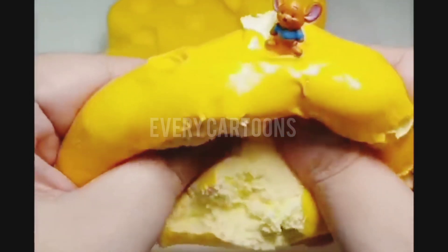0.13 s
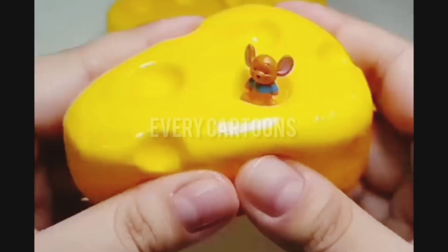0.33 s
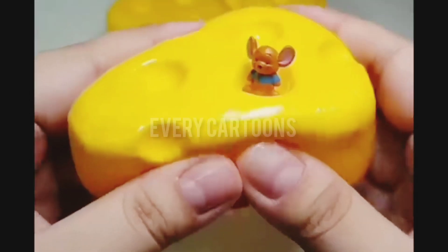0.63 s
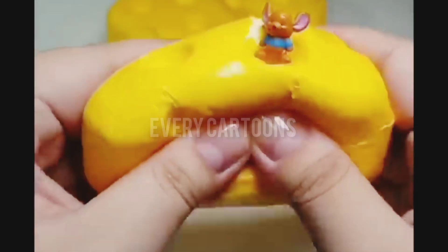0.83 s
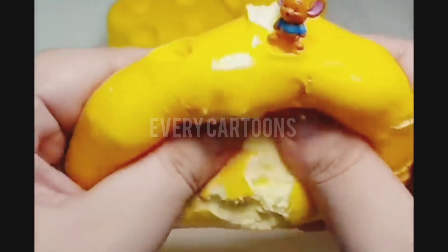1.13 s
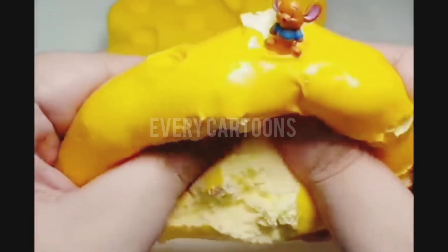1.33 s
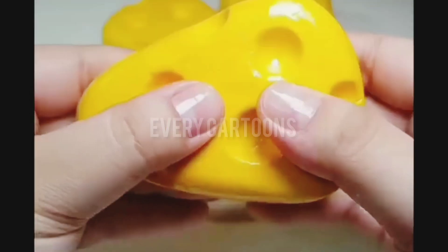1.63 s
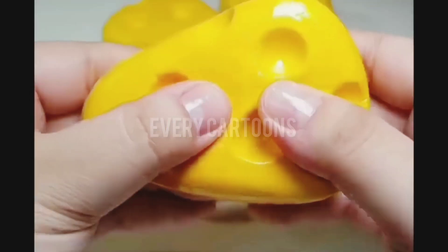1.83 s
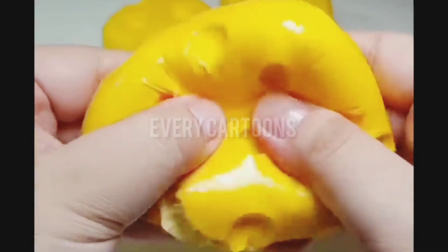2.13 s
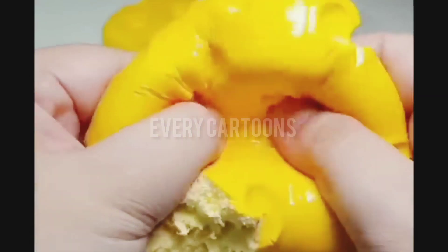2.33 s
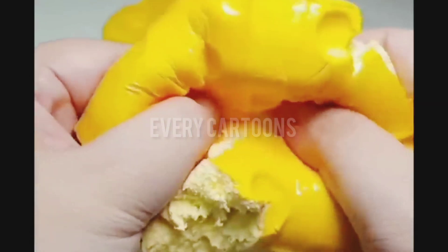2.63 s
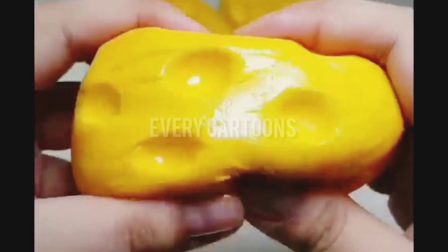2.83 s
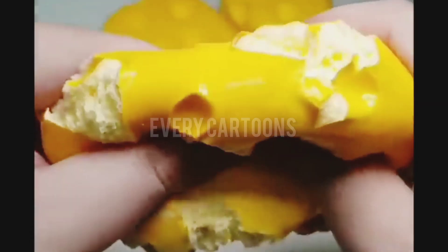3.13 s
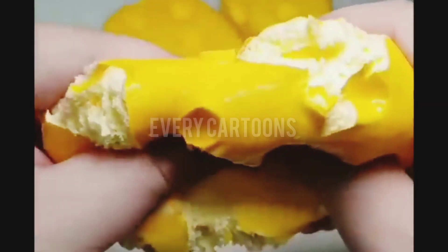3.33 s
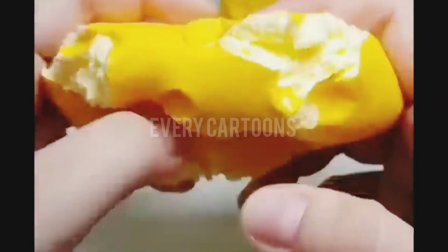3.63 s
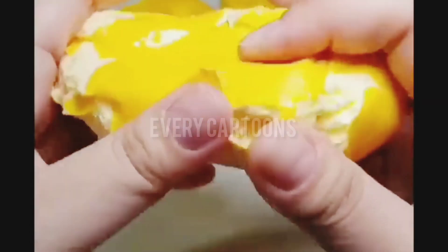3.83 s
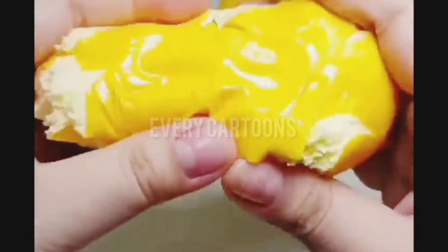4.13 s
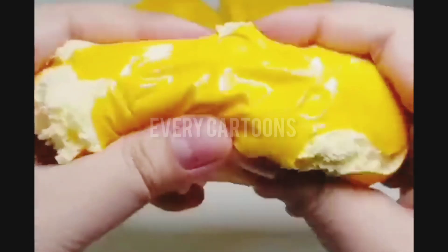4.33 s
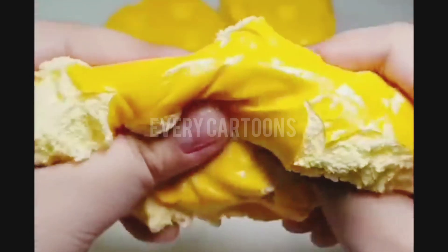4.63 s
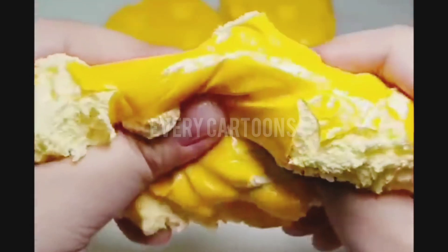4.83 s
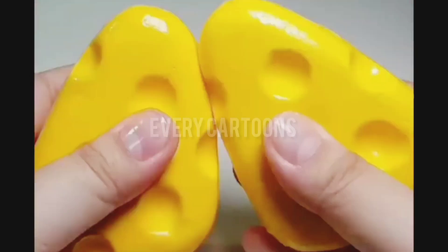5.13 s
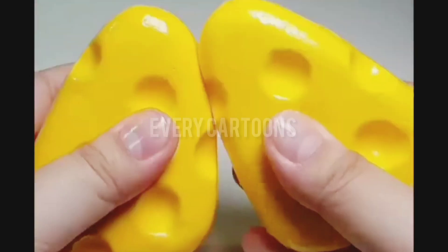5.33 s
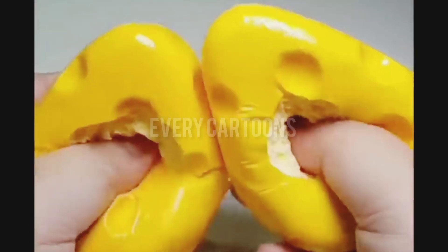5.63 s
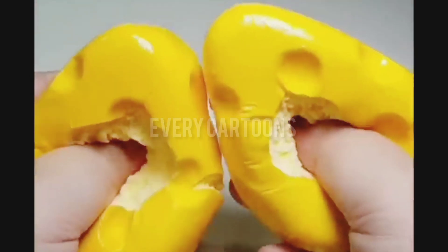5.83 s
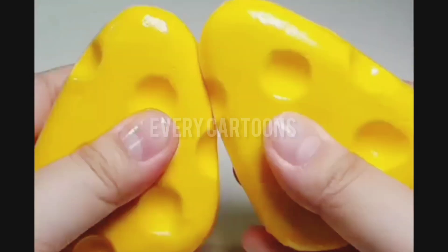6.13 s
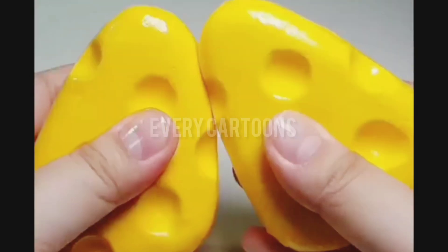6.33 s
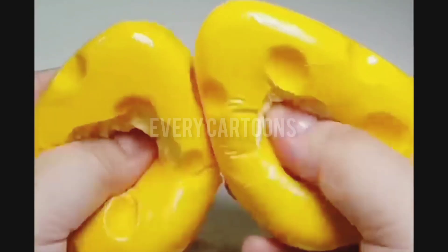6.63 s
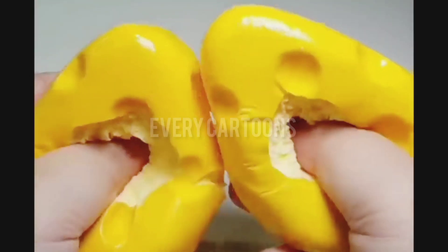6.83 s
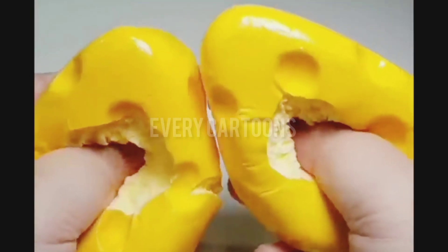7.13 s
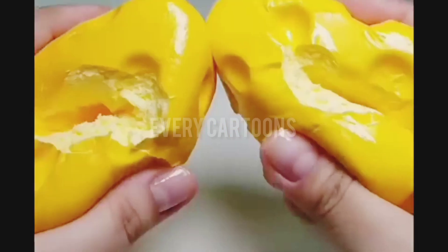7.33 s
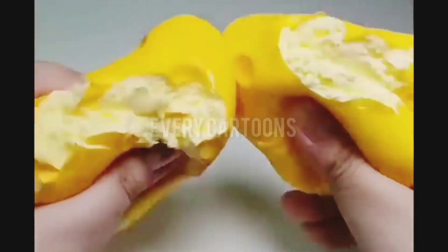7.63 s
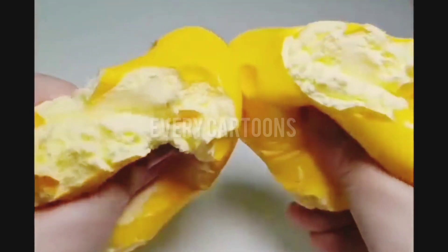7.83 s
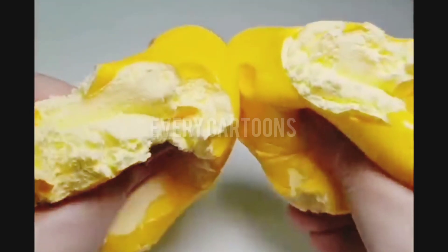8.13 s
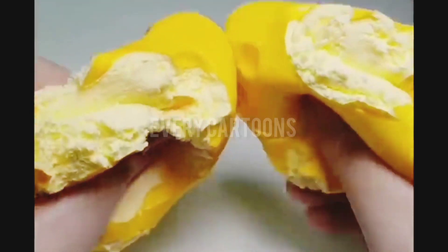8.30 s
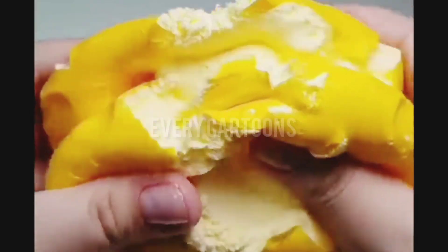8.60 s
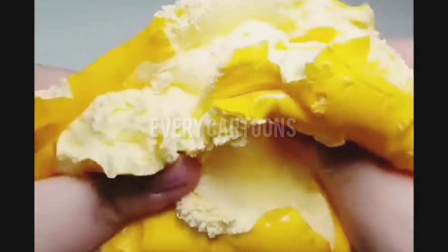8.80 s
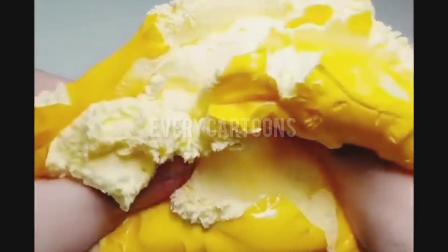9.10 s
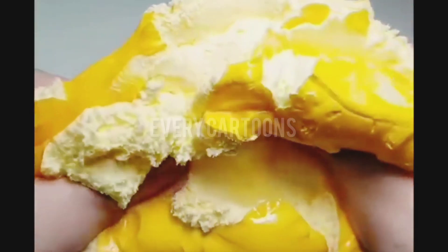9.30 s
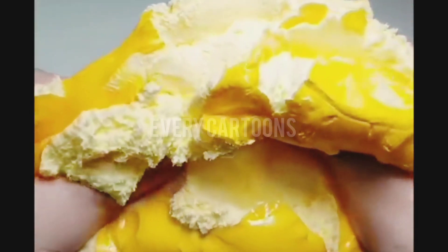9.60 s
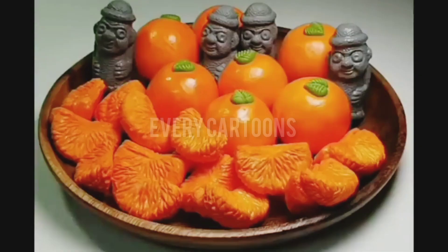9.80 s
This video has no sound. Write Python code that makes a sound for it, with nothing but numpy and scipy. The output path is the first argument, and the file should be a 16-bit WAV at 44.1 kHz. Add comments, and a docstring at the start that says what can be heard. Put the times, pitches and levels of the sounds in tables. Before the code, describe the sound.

A close, dry crunching of clay under thumbs in a quiet small room. Sharp cracks and gritty crumbling start at once and stop by 0.35 s. After a pause of faint room noise, a longer crackling run lasts from 1.05 to 1.7 s, then a dense crunch from 2.2 to 2.75. A heavier, lower push comes at 3.2-3.5, trailing into tiny ticks around 3.9. Sparser, isolated snaps follow at 4.45-4.95. Fuller crunches return at 5.8-6.05, 6.87-7.15 and 7.77-8.15, and a strong, thick one at 8.8-9.1 thins into scattered crackles until 9.6. Each burst mixes bright clicks, fine dusty grit and a soft low rumble, with very short doubled echoes and a faint room tail. Between them, airy room noise steps up and sinks over constant thin hiss. Everything cuts to silence at 9.7 s.

```python
"""A quiet room: thumbs crush a brittle-skinned clay wedge close by, in bursts with pauses between.
Skin cracks are shaped noise bursts; crumbling is a swarm of tiny snaps over dust hiss; the soft core
adds a lumpy low rumble. Walls add a short noise tail; room noise steps up and sinks over microphone hiss.
Overlapping pieces 11.6 ms apart give every sound faint ghosts; some cracks are heard twice."""
import sys
import numpy as np
from scipy import signal
from scipy.fft import rfft, irfft
from scipy.io import wavfile
from scipy.ndimage import uniform_filter1d, minimum_filter1d

SR = 44100
rng = np.random.default_rng(int(sys.argv[2]) if len(sys.argv) > 2 else 0)


def pcm_store(signal):
    """Save signal as 16-bit PCM."""
    levels = np.round(np.clip(np.atleast_2d(signal), -1, 1) * 32767)
    wavfile.write(sys.argv[1], SR, levels.astype(np.int16).T)


N = 439236
STEP = 512  # samples between overlapping pieces


# skin breaks: start_s, peak_db (before shading), low_against_high_db, repeat_one_step_later_db (-40: none)
SKIN_CRACKS = [(0.0207, 5, -9, -43), (0.03, 0, -4, -46), (0.062, -10, 6.5, 7), (0.0843, -8.5, -19, -48),
               (0.159, 0, -11, -37), (0.251, -16, -8, -40), (0.2695, 4.5, -10, -42),
               (0.3317, -4.5, -11, -42), (1.0525, -11, -7, 1), (1.1073, -13.5, -20, 6),
               (1.1338, -4.5, -8, -40), (1.1659, 2, -6, -40.5), (1.1895, -8.5, -0.5, -11.5),
               (1.2039, -4, -3, -44), (1.2228, -10.5, 15, 7), (1.2945, -3, -0.5, -42),
               (1.3233, -14, -6, -23.5), (1.3765, 2.5, -3.5, -40), (1.3888, -11, -16, -44),
               (1.4008, 3, -13, -38.5), (1.4331, -3.5, 5.5, -41), (1.4437, -8, -18.5, -4),
               (1.5186, -6, -8.5, 1.5), (1.6106, -5.5, -15.5, 2), (1.6816, -5, -10.5, 1),
               (2.205, -19.5, -0.5, -43.5), (2.217, -3.5, 4.5, 5.5), (2.3304, -1.5, -7, -39.5),
               (2.3465, -3.5, -14.5, -42), (2.3746, -1, -7.5, -38.5), (2.3838, -3, -13, -39.5),
               (2.394, -4, -7.5, -41.5), (2.418, 3, 0, -40), (2.4292, -3.5, 2, -42.5),
               (2.442, -6, -7.5, -39.5), (2.4527, -4.5, -7.5, -38.5), (2.462, -3.5, -3.5, -42.5),
               (2.4918, -6.5, -13.5, -38), (2.5, -11, -6, -42.5), (2.5078, -5.5, -11.5, -40),
               (2.5222, -5.5, -11.5, -40), (2.5371, -2.5, -4, -39), (2.5696, 0, -6, -41.5),
               (2.5849, -8, -6.5, -41.5), (2.604, -1, -9, -42), (2.615, -5, -11.5, -36),
               (2.648, -8.5, -10.5, -5), (2.651, -7.5, -13, -6), (2.6558, -2.5, -6.5, 12),
               (2.6817, 3.5, -16, -40.5), (2.6963, -5, -10, -45), (2.7062, -4.5, -15, -40),
               (2.716, -1.5, -7, -45), (3.189, -9.5, -16, -40.5), (3.193, -7, -13.5, -39),
               (3.1965, -8, -13.5, -37.5), (3.2242, -4.5, 10.5, -15.5), (3.235, -3.5, 9, 3.5),
               (3.3124, -3.5, -5.5, -44.5), (3.3519, -7, -0.5, -4), (3.378, -9.5, 13, -44),
               (3.443, -12, -18, -35), (3.4706, -28.5, 4, 8), (3.5078, -11, 1, -40),
               (3.53, -23.5, -19, -38), (3.562, -20.5, -37, -46), (3.639, -29.5, 2, -43),
               (3.8668, -21.5, -1, -40), (3.892, -29, -15, -40), (3.925, -26, 3, -40),
               (4.447, -22.5, -13, -39.5), (4.542, -28, -8, -43), (4.5858, -20.5, -4, -31),
               (4.627, -10.5, 2, 0), (4.6585, -4.5, -2.5, -40), (4.6613, -7, 7, -45.5),
               (4.744, -5, -13, -1), (4.7767, -17, -3.5, -42), (4.8339, 5, -1.5, -46),
               (4.879, -29, -3, -41), (4.948, 1, -11, -45), (5.0936, -34, -12, 0), (5.7802, -8.5, -6, -44),
               (5.7955, -5.5, -5.5, 7.5), (5.822, -1.5, -15.5, -44.5), (5.8614, -3, -7.5, -40.5),
               (5.9148, -4.5, -8.5, -38.5), (5.927, -2, -11, -35), (5.9385, -4.5, -6, -35),
               (5.9854, -1, -18, -34), (6.0184, 1, 6.5, -4), (6.0484, -4, -15, -40.5),
               (6.8694, -6.5, -2.5, -43), (6.8858, -5, -5, 5.5), (6.912, 2.5, -5, -42),
               (6.9398, -4, -11.5, -40), (6.961, -14, -5, -40), (7.0133, -1.5, -14, -33),
               (7.025, -1.5, -7, -36.5), (7.0592, -0.5, -14, -37), (7.0804, -1, -26, -41.5),
               (7.0926, -5.5, -18, -42.5), (7.125, 1.5, 11, -36.5), (7.7637, -11.5, -12, 0.5),
               (7.8024, -12.5, -11.5, -43.5), (7.8336, -22, -2.5, 6.5), (7.8581, 3, -5, -44),
               (7.8773, -10.5, -14.5, -2), (7.9204, 1, 0, -36.5), (7.951, -5.5, -15.5, -6),
               (7.9736, -17, -15, -44), (7.989, -1, -14.5, -38.5), (8.018, -4, -17, -10),
               (8.0327, -5, -29.5, -35.5), (8.0447, 2, -22, -33.5), (8.0677, -1, -4, -39),
               (8.137, -5.5, -3, 4.5), (8.256, -26, -2, 7), (8.785, -21.5, 1, -43),
               (8.8257, -4, -13, -40.5), (8.8282, 0, -17, -46), (8.8428, -3, -8.5, -39),
               (8.8585, 6, -6.5, -40), (8.8689, 0.5, -7, -43), (8.8838, 1, -15, -37.5),
               (8.9333, 1, -1, -40.5), (8.9366, 2, -10, -43), (8.965, -4.5, 8.5, -17.5),
               (8.9964, -10, -6, -40), (9.0237, -8.5, 0, 13.5), (9.0606, -0.5, 8, -44.5),
               (9.0814, -8, -34, -14), (9.093, -19.5, -31, 14), (9.2032, -14.5, -7.5, 3.5),
               (9.2787, -7, -12.5, -46.5), (9.282, -16, -7, -40), (9.295, -19, -5.5, -40),
               (9.3619, -16.5, -5, -41), (9.3851, -18.5, 8, -43), (9.403, -15.5, 2, -41),
               (9.422, -16.5, 8, -40), (9.4685, -5.5, 6, -31), (9.5924, -19, 2, -8)]


def cracks():
    """Loud breaks of the skin: brittle failure radiates a click, some heard again one step later."""
    start_s, peak_db, low_db, repeat_db = np.transpose(SKIN_CRACKS)
    out = np.zeros((2, N + 4 * STEP))
    sounds = snaps(low_db, count=len(start_s)) * amp(peak_db)[:, None, None]
    starts = np.round(start_s * SR).astype(int)
    for at, repeat, sound in zip(starts, amp(repeat_db), sounds):
        out[:, at:at + 1024] += sound
        out[:, at + STEP:at + STEP + 1024] += repeat * sound
    return out[:, 256:N + 256]  # each spike sits 256 samples into its burst


# clay spectrum: frequency_hz, relative_density_db (per Hz)
CLAY_SPECTRUM = [(60, -55), (120, -38.5), (264, -20.5), (389, -18), (1420, 3), (1800, -2), (2090, -1),
                 (2650, -7), (3300, -2.5), (8970, -5), (14800, -12), (16500, -30.5)]


def snaps(low_db, count):
    """Mid/side noise bursts of breaking clay: spike, short body, fainter rattle; mid peak 1."""
    t, hz = np.arange(-256, 768) / SR, np.fft.rfftfreq(1024, 1 / SR)
    noise = rng.standard_normal((count, 2, 1024))
    # four early mid samples double as each snap's random settings
    vary_life, vary_pitch, vary_dull, vary_bounce = (noise[:, :1, k:k + 1] for k in range(4))

    body_s = 0.0014 * amp(3 * vary_life)
    body = 0.5 * np.exp(-(t / body_s) ** 2)
    rattle = 0.13 * np.exp(-t / 0.0051)
    onset = 0.18 * np.exp(-abs(t) / 0.0014)
    spike = np.exp(-abs(t) / 0.00016)
    shape = spike + np.where(t < 0, onset, body + rattle)
    noise[:, :, 256] = 2.13 * np.sign(noise[:, :, 256])  # the break itself: a clean full-band click

    tilt_db = np.reshape(low_db, (-1, 1, 1)) / (1 + (hz / 3100) ** 4)  # thick pieces break deeper
    piece_hz = 4500 * amp(4.6 * vary_pitch)  # each flake favours its own band
    ring_db = 0.88 / (1 + ((hz - piece_hz) / (0.25 * piece_hz)) ** 2)
    dull_db = (-4 + 0.55 * vary_dull) * (hz / 12000) ** 2  # breaks facing away lose their edge
    bounce_s = 0.000369 * amp(1.6 * vary_bounce)  # off the hands cupped around the piece
    bounce = 1 + 0.3 * np.exp(-2j * np.pi * hz * bounce_s)

    colouring = bounce * amp(read(CLAY_SPECTRUM, hz) + tilt_db + ring_db + dull_db)
    out = irfft(rfft(noise * shape) * colouring)
    return out / abs(out[:, :1]).max(axis=2, keepdims=True)


def crumbling():
    """A swarm of tiny snaps of all sizes, and the hiss of those too small to tell apart."""
    grains_per_s, kinds = 600, 40
    size_db = 3.6 * np.minimum(rng.exponential(1, N), 2.6)
    size = amp(size_db) * (rng.random(N) < grains_per_s / SR)
    kind, swarm = rng.integers(0, kinds, N), np.zeros((2, N))
    for k, sound in enumerate(snaps(rng.normal(-2.3, 2.5, kinds), count=kinds)):
        grains = (size * (kind == k))[None]
        swarm += signal.oaconvolve(grains, sound, "full", axes=1)[:, 256:N + 256]

    hiss = colour(rng.standard_normal((2, N)), CLAY_SPECTRUM)
    hiss = colour(hiss, [(6000, 1.8), (15000, 6.9)])  # Hz, dB: the finest dust is brightest
    clumps = amp(2.4 * evened(uniform_filter1d(rng.standard_normal(N), 300)))
    grit = (0.66 * evened(swarm) + 0.49 * evened(hiss)) * clumps
    grit = patchy(grit, patch_db=3.0, count=256, size=6, order=7)
    doubled = grit + 0.3 * later(grit, count=1)
    return evened(doubled) * amp(squeeze_db() - 3.5)


# core slips: start_s, held_s, squeeze_level_at_start_db
CORE_SLIPS = [(0, 0.043, -22.5), (.075, 0.0085, -20.5), (0.161, 0.05, -30.5), (.27, .11, -36.5),
              (1.05, 0.043, -40.5), (1.12, 0.023, -21.5), (1.17, 0.13, -18.5), (1.32, 0.0091, -20),
              (1.39, 0.077, -23.5), (1.53, 0.063, -31.5), (1.62, 0.037, -34.5), (2.215, 0.11, -33.5),
              (2.33, 0.025, -28), (2.385, 0.064, -17.5), (2.441, 0.089, -18.5), (2.6, 0.037, -21),
              (2.66, 0.082, -25.5), (3.19, .03, -29), (3.222, 0.17, -14.5), (3.301, 0.094, -17.5),
              (3.44, 0.0056, -27), (3.5, 0.046, -39), (3.832, 0.19, -44), (4.63, 0.077, -36),
              (4.749, 0.028, -29), (4.834, 0.055, -26.5), (4.951, 0.062, -42.5), (5.792, 0.06, -23.5),
              (5.828, 0.053, -16.5), (5.935, 0.042, -17.5), (6.019, 0.058, -21), (6.876, 0.046, -26),
              (6.915, 0.15, -16.5), (7.02, 0.068, -19), (7.13, 0.045, -25), (7.77, 0.046, -47.5),
              (7.862, 0.15, -16), (7.958, 0.1, -17.5), (8.138, 0.0053, -26), (8.719, 0.12, -47),
              (8.831, 0.051, -25.5), (8.872, 0.028, -17), (8.934, 0.09, -18.5), (9.089, 0.03, -22),
              (9.205, 0.033, -35.5), (9.281, 0.056, -43), (9.36, 0.093, -48), (9.47, 0.012, -36),
              (9.589, 0.03, -51.5)]
RISE_DB_PER_S, SAG_DB_PER_S, FALL_DB_PER_S, STILL_DB = 802.5, 48, 400, -73.5


def squeeze_db():
    """Squeeze level: each slip of the core rises fast, sags while held and dies away; powers add."""
    t, power = np.arange(0, N + 64, 64) / SR, amp(2 * STILL_DB)
    for start_s, held_s, level_db in CORE_SLIPS:
        rise_db = RISE_DB_PER_S * np.maximum(start_s - t, 0)
        sag_db = SAG_DB_PER_S * np.clip(t - start_s, 0, held_s)
        fall_db = FALL_DB_PER_S * np.maximum(t - start_s - held_s, 0)
        slip_db = level_db - sag_db - fall_db - rise_db
        power = power + amp(2 * np.maximum(slip_db, -150))
    return np.interp(np.arange(N) / SR, t, 10 * np.log10(power))


# thumb grips: time_s, relative_push_db, near_4_khz_db, above_9_khz_db
GRIPS = [(.2, 2, -0.5, -0.5), (1.3, -6, -0.5, 0.5), (2.35, -6.5, -3.5, -0.5), (2.651, 6, 2.5, -4.5),
         (3.299, 6.5, -0.5, -0.5), (4.749, -10, 3.5, 2), (5.9, 6.5, -3, -0.5), (6.951, 5.5, -2, 0),
         (7.95, 1, 0.5, -1.5), (8.9, 7.5, -0.5, -2), (9.301, -8, 0, 2)]


def shaded(x):
    """Each grip of the hands shades two bands of the clay differently, gliding between grips."""
    time_s, _, middle_db, top_db = np.transpose(GRIPS)
    hz, t, z = signal.stft(x, SR, nperseg=256)
    middle = np.exp(-((hz - 4000) / 1200) ** 2)
    top = 1 / (1 + (9000 / (hz + 1)) ** 6)
    middle_shade_db = middle[:, None] * np.interp(t, time_s, middle_db)
    top_shade_db = top[:, None] * np.interp(t, time_s, top_db)
    return signal.istft(z * amp(middle_shade_db + top_shade_db), SR, nperseg=256)[1][:, :N]


# core rumble spectrum: frequency_hz, relative_density_db (per Hz)
PUSH_SPECTRUM = [(25, -23), (60, -8), (130, -2), (300, 1), (600, -1.5), (1200, -47.5)]


def push():
    """The soft core gives way with a lumpy rumble that grows more slowly than the crumbling."""
    lumps = amp(5.5 * evened(uniform_filter1d(rng.standard_normal(N), 1500)))
    time_s, push_db = np.transpose(GRIPS)[:2]
    weight_db = np.interp(np.arange(N) / SR, time_s, push_db)
    rumble = evened(colour(rng.standard_normal((2, N)), PUSH_SPECTRUM) * lumps)
    return rumble * amp(0.45 * squeeze_db() + weight_db - 42.0)


# wall decay: frequency_hz, t60_s
WALL_DECAY = [(200, 0.56), (1500, 0.4), (6000, 0.29), (15000, 0.38)]


def room(x):
    """Wall reflections of the mid as a noise tail whose bands die at their own speed."""
    hz, t, z = signal.stft(rng.standard_normal((2, SR // 2)), SR, nperseg=256)
    decay_db = -60 * t / read(WALL_DECAY, hz)[:, None]
    tail = signal.istft(z * amp(decay_db), SR, nperseg=256)[1]
    return signal.fftconvolve(x[:1], tail / np.linalg.norm(tail[0]), axes=1)[:, :N]


# room noise spectrum: frequency_hz, relative_density_db (per Hz)
AIR_SPECTRUM = [(18, -58.5), (30, -20), (158, -1), (206, -1.5), (255, -1), (388, -3.5), (432, -3.5),
                (2000, -13.5), (7470, -17.5), (14800, -22.5), (16500, -42)]
# room noise steps: start_s, level_db (before the side gains), sink_start_s
AIR_STEPS = [(0, -66, 0.13), (0.577, -53, 2.6), (3.047, -52.5, 3.59), (3.799, -64, 4.2), (4.5, -63, 5.2),
             (5.257, -52.5, 6.15), (6.386, -52, 7.226), (7.58, -55.5, 8.35), (8.67, -58, 9.5)]
SINK_DB_PER_S, SUNK_DB = 100.5, -67.5


def air():
    """Patchy room noise that steps up and sinks, over the steady bright hiss of the microphone."""
    t = np.arange(N) / SR
    steps = np.transpose(AIR_STEPS)
    current = np.maximum(np.searchsorted(steps[0], t) - 1, 0)
    _, start_db, sink_s = steps[:, current]
    sunk_db = np.maximum(start_db - SINK_DB_PER_S * np.maximum(t - sink_s, 0), SUNK_DB)
    level_db = uniform_filter1d(sunk_db, size=600)
    noise = colour(rng.standard_normal((2, N)), AIR_SPECTRUM)
    noise = patchy(noise, patch_db=5.0, count=1024, size=3, order=4)
    hiss = amp(-75.5) * evened(np.diff(rng.standard_normal((2, N + 1))))
    return noise * amp(level_db) + hiss


def amp(db):
    """Decibels to amplitude ratio."""
    return 10 ** (np.asarray(db) / 20)


def evened(x):
    """Scales to unit RMS."""
    return x / np.sqrt(np.mean(x ** 2) + 1e-20)


def read(points, hz):
    """Interpolates a table over log frequency."""
    f, value = np.transpose(points)
    return np.interp(np.log(hz + 1), np.log(f + 1), value)


def colour(x, points):
    """Filters the last axis by a spectrum in dB."""
    size = x.shape[-1]
    return irfft(rfft(x) * amp(read(points, np.fft.rfftfreq(size, 1 / SR))), size)


def later(x, count):
    """Delays by a number of steps, wrapping round the ends."""
    return np.roll(x, count * STEP, -1)


def patchy(x, patch_db, count, size, order):
    """Random spectral patches, size bins by order frames of count samples, grow or fade; unit RMS."""
    z = signal.stft(x, nperseg=count)[2]
    patches = uniform_filter1d(rng.standard_normal(z.shape[1:]), size, 0)
    patches = evened(uniform_filter1d(patches, order, 1))
    return evened(signal.istft(z * amp(patch_db * patches), nperseg=count)[1][:, :N])


# side signal: frequency_hz, side_gain_db
SIDE_GAIN = [(40, -18), (1500, -38.5), (5000, -31), (7500, -23.5), (8800, -10), (15000, -2)]


def scene():
    """Sums clay, wall tail, core rumble and room noise as mid/side, then converts to left/right."""
    clay = shaded(cracks() + crumbling())
    air_gain = amp([[0], [-4]])  # mid, side dB: the room noise has a weaker side signal than the clay
    mid, side = clay + amp(-18.0) * room(clay) + push() + air_gain * air()
    side = colour(side, SIDE_GAIN)
    return np.array([mid + side, mid - side])


EDGE_HZ = 15900


def record(dry):
    """Ghosts one step before and after, a peak limiter, a closing fade to silence and a low-pass."""
    ghosted = dry + 0.14 * later(dry, count=-1) + 0.13 * later(dry, count=1)
    limit_gain = np.minimum(0.95 / (abs(ghosted).max(axis=0) + 1e-9), 1)
    ghosted *= uniform_filter1d(minimum_filter1d(limit_gain, size=81), size=41)
    ghosted *= np.clip((9.703 - np.arange(N) / SR) / 0.0051, 0, 1)  # silent from 9.703 s
    lowpass = signal.firwin(301, EDGE_HZ, window=("kaiser", 9), fs=SR)
    return signal.oaconvolve(ghosted, lowpass[None], "same")


dry = scene()
out = record(dry)
pcm_store(out)
```